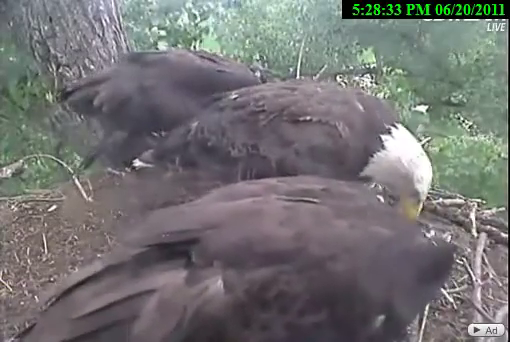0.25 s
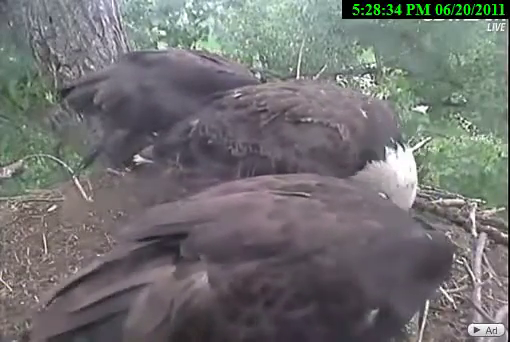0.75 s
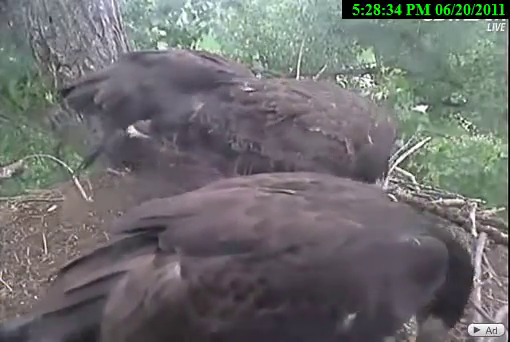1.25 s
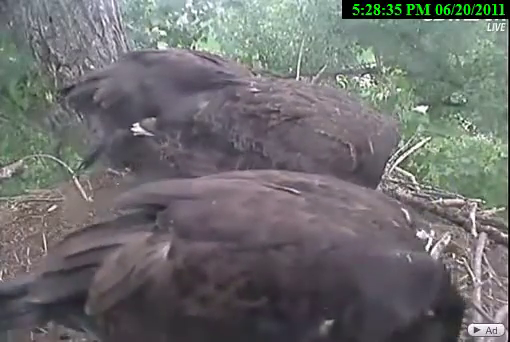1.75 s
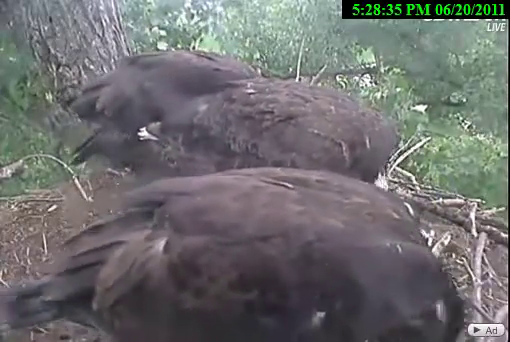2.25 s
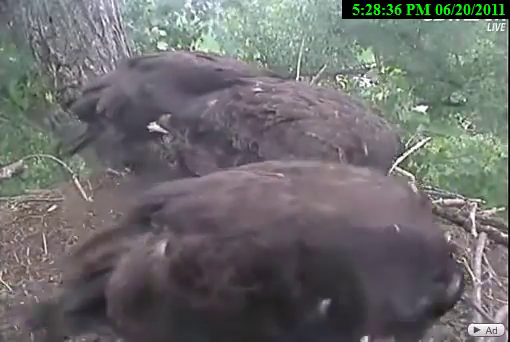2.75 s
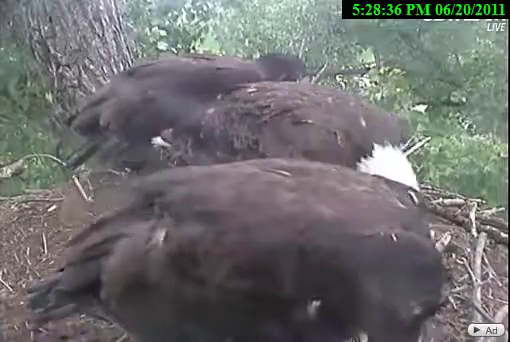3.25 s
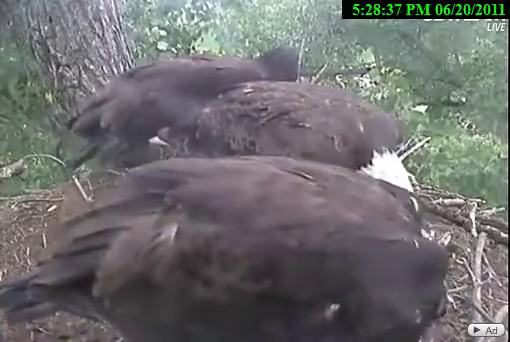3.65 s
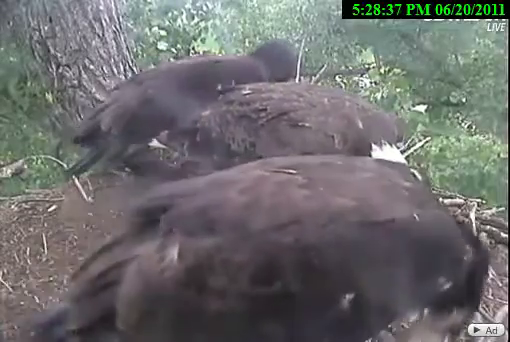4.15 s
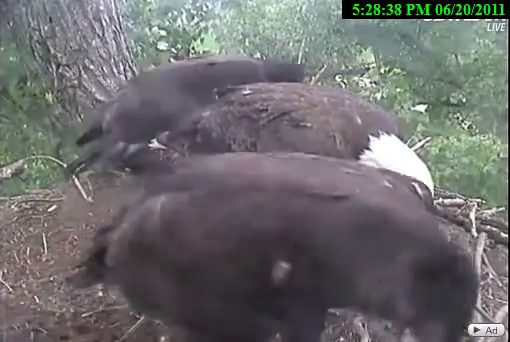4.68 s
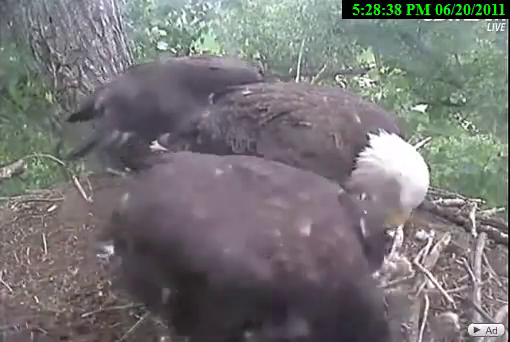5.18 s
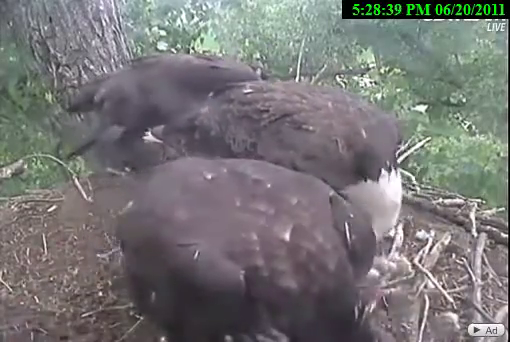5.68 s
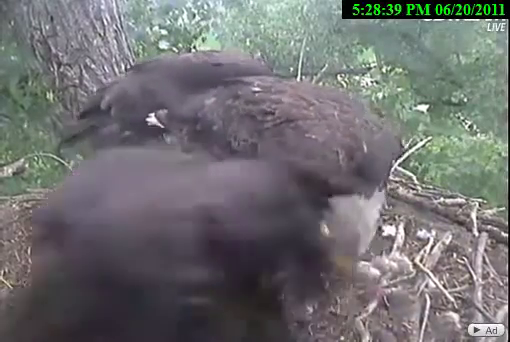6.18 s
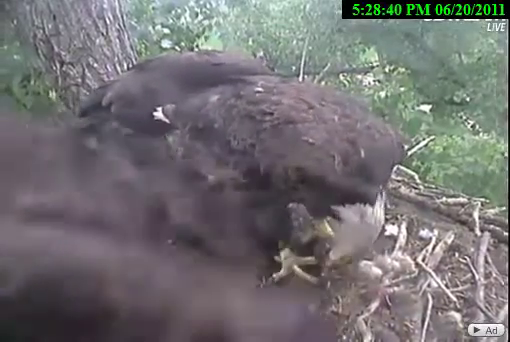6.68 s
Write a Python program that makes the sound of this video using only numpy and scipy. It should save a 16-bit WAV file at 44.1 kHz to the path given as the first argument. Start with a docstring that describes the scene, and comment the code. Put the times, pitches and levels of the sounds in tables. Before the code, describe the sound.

Over a steady, faraway hum in the woods, a soft rustle of feathers leads into a string of six shrill begging squeals from a young eagle. The whistles rise, waver and rasp, sometimes splitting into two tones, and the later ones start with a tiny peep. A few light knocks and a crunch come from the nest's sticks. The close outdoor microphone overloads a little on the peaks.

```python
"""A young eagle begs on a stick nest in woodland, close to a cheap outdoor microphone. First, over a distant
drone, feathers rustle and another bird's falling chirp rings out as the first of six squeals begins. In each,
the whistle climbs in steps, turns hoarse, at times splits in two, and finally drops. From the second squeal on,
a peep leads in, and now and then sticks knock or crunch. Throughout, the trees return the sound, and the
loudest whistles overload a slow converter."""
import sys
import numpy as np
from scipy import signal
from scipy.fft import rfft, irfft, next_fast_len
from scipy.io import wavfile
from scipy.ndimage import uniform_filter1d, minimum_filter1d

SR = 44100
rng = np.random.default_rng(int(sys.argv[2]) if len(sys.argv) > 2 else 0)


def master_out(mix):
    """Clip the mix to full scale and print it as 16-bit PCM to the path in sys.argv[1]."""
    frames = np.transpose(np.atleast_2d(mix))
    ceiling = np.clip(frames, -1, 1)
    pcm = np.round(ceiling * 32767).astype(np.int16)
    wavfile.write(sys.argv[1], SR, pcm)


N = 305172

# spectral density of the distant drone: frequency_hz, relative_db
DRONE_SPECTRUM = [(12, -57.5), (20, -25), (110, -16), (172, -13.5), (339, -12.5), (489, -10.5), (764, -4.5),
                  (1260, -20), (1630, -29.5), (3680, -34.5), (4540, -29), (4910, -43), (5750, -37),
                  (8080, -47), (10500, -54.5), (13600, -103), (22000, -120)]
# harmonics of the mains hum: frequency_hz, level_db
MAINS_HARMONICS = [(60, -63.5), (120, -63.5)]
# feathers brushing over dry sticks: start_s, end_s, level_db
FEATHER_STROKES = [(0., 0.084, -45.5), (0.085, 0.305, -42), (0.402, 0.68, -42.5)]
# normal modes of the sticks: frequency_hz, relative_db, t60_s
STICK_MODES = [(338, -16, 0.036), (577, -0.5, 0.014), (744, -9.5, 0.074), (1160, -12.5, 0.034),
               (1550, -6, 0.011), (2800, -39, .01)]
# blows on the sticks: start_s, relative_db, contact_ms
STICK_BLOWS = [(2.282, 5, 0.95), (2.29, -10, 0.49), (2.295, -21, 0.99), (2.3, 1.5, 0.82), (2.304, -4, 0.37),
               (2.599, -15, 0.74), (2.991, -12.5, 1), (5.163, -6, 1), (5.175, -4, 0.58), (5.191, -14, 0.98),
               (5.285, -22, 0.79), (6.732, -6.5, 0.92)]
# twigs crunching under a foot: start_s, length_s, relative_db
TWIG_CRUNCHES = [(2.28, 0.029, -23), (2.574, 0.033, -53)]
# the opening, falling chirp: time_s, pitch_hz, level_db, overtone_relative_db
CHIRP_CONTOUR = [(.117, 3710, -26, -20), (.124, 3390, -23.5, -19), (.134, 2960, -20, 5.5),
                 (.143, 2890, -18, -4), (.154, 2746, -28, -14), (.157, 2820, -14, -8)]
# short peeps: start_s, length_s, from_hz, to_hz, peak_db, overtone_relative_db
PEEP_GLIDES = [(0.153, 0.026, 2220, 1960, -30, -28), (1.825, 0.016, 1420, 1400, -34, -6),
               (2.986, 0.029, 1350, 1400, -31.5, -20), (4.222, .021, 1310, 1460, -24.5, -13.5),
               (5.494, .024, 1250, 1520, -24, -18), (6.73, 0.029, 1260, 1450, -24, -5.5)]
# the other half of the voice box, one list a split: time_s, pitch_hz, level_db
SPLIT_CONTOURS = [
    [(.30, 3560, -34), (.34, 3760, -41), (.40, 3850, -41)],
    [(.85, 4800, -36), (.89, 4820, -35), (.96, 4750, -32)],
    [(2.46, 5560, -38), (2.53, 6000, -32), (2.6, 5440, -48)],
    [(3.07, 3650, -42), (3.2, 3700, -44), (3.31, 3750, -42), (3.41, 3750, -47)],
    [(4.79, 4870, -36), (4.87, 4600, -37), (4.89, 5220, -26), (4.925, 5480, -34), (4.94, 5000, -41),
     (5.1, 5020, -30.5)],
    [(5.74, 4240, -36), (5.78, 4380, -32), (5.815, 4380, -38)],
    [(6.15, 5000, -37), (6.25, 4850, -37), (6.32, 5000, -35.5), (6.385, 5190, -20)],
    [(6.478, 5770, -28), (6.495, 6085, -19), (6.52, 6170, -22), (6.535, 5760, -39)],
]
# resonances of the throat: centre_hz, width_hz, relative_db
THROAT_FORMANTS = [(2643, 720, 5), (3870, 1900, 8.5), (4550, 2000, -15), (6460, 2500, 2)]
# one list a squeal, each note held until the next: start_s, from_hz, to_hz, from_db, to_db, rasp_relative_db
SQUEAL_NOTES = [
    [(.15, 3620, 3656, -24, -23, -24), (.285, 3670, 3750, -27, -41, -15),
     (.315, 4035, 4323, -30, -28, -20.5), (.5, 4340, 4440, -23.5, -25, -25),
     (.6, 4450, 4390, -27, -39.5, -16), (.666, 4490, 5060, -30, -32, -21),
     (.775, 5045, 5164, -24, -24, -17.5), (.833, 5170, 5040, -27, -27, -24),
     (.861, 5135, 5340, -25.5, -22, -33), (.908, 5356, 5165, -25.5, -23.5, -31),
     (.963, 4840, 4704, -21.5, -18, -31), (1.04, 4700, 4780, -18.5, -19, -37),
     (1.075, 4765, 4800, -7, -10.5, -32), (1.18, 4705, 4990, -20.5, -20, -13.5),
     (1.265, 4798, 4795, -7, -19.5, -37), (1.35, 4920, 4970, -26.5, -25.5, -2),
     (1.41, 4880, 4760, -24, -12.5, -14)],
    [(1.837, 2650, 3490, -40.5, -25.5, -4), (1.865, 3550, 3550, -18, -39, -21),
     (1.88, 3650, 3794, -12, -28, -27), (1.937, 4090, 4240, -16, -19, -30),
     (1.985, 4200, 4470, -27, -14.5, -28), (2.038, 4380, 4310, -20.5, -22, -16.5),
     (2.087, 4268, 4210, -11.5, -13, -25.5), (2.168, 4346, 4360, -16, -23, -14.5),
     (2.225, 4440, 4614, -24.5, -9, -23), (2.28, 4540, 4760, -20, -14.5, -13),
     (2.325, 4760, 4700, -21, -29, -15), (2.351, 4800, 4756, -17, -20, -36),
     (2.395, 4930, 4720, -20.5, -22, -28), (2.465, 4850, 5130, -25, -17.5, -20),
     (2.545, 5170, 5010, -22, -18.5, -24), (2.598, 4930, 4800, -16.5, -15.5, -16.5)],
    [(3.013, 3350, 3531, -26, -23, -10), (3.029, 3607, 3690, -12, -10, -18),
     (3.053, 4220, 4360, -17, -26, -11.5), (3.098, 4315, 4224, -22, -18.5, -14),
     (3.168, 4236, 4320, -21, -38, -17), (3.235, 4480, 4430, -30, -38, -12),
     (3.32, 4490, 4510, -31.5, -22.5, -21), (3.365, 4460, 4790, -22, -23, -20),
     (3.393, 4660, 4600, -20, -22.5, -18), (3.43, 4820, 4980, -26, -25, -7.5),
     (3.475, 4950, 5304, -19.5, -11.5, -34), (3.535, 5410, 5300, -4.5, -19, -19.5),
     (3.585, 5110, 5256, -28.5, -14.5, -19), (3.628, 5170, 5420, -16, -34.5, -11.5),
     (3.676, 5180, 5350, -22, -10.5, -19), (3.735, 5240, 5410, -14.5, -13.5, -16),
     (3.79, 5520, 5250, -14.5, -11, -24)],
    [(4.238, 3370, 3500, -36, -17.5, -8), (4.271, 4080, 4140, -16.5, -18.5, -24),
     (4.325, 3710, 3710, -22, -11, -11.5), (4.346, 4255, 4910, -18.5, -37.5, -10),
     (4.45, 4290, 4740, -27, -28.5, -13.5), (4.55, 4680, 4760, -26.5, -21.5, -16.5),
     (4.643, 5300, 5380, -26, -17, -17), (4.682, 5330, 4900, -23, -32, -15),
     (4.71, 5200, 4890, -22, -27, -13), (4.737, 4750, 4930, -15.5, -23.5, -21),
     (4.78, 5290, 5390, -22.5, -18.5, -32), (4.826, 5350, 5430, -16, -27, -28),
     (4.882, 4710, 5010, -28, -23, -9), (4.932, 5290, 5330, -21, -32.5, -19),
     (5.012, 5310, 5310, -20.5, -29.5, -23)],
    [(5.497, 2665, 3565, -41.5, -28, -2), (5.56, 4020, 4490, -24.5, -33, -18),
     (5.685, 4510, 4330, -23, -37, -16), (5.716, 4165, 4320, -17.5, -28.5, -17.5),
     (5.818, 4450, 4330, -29, -23, -22), (5.857, 4274, 4385, -26, -21, -16),
     (5.9, 4400, 4370, -32.5, -24, -13), (5.934, 4570, 5060, -38, -31.5, -4),
     (5.985, 4900, 4750, -37, -31.5, -1), (6.051, 5040, 5220, -39.5, -35, 6.5),
     (6.1, 5426, 5580, -32, -38.5, 4), (6.14, 5520, 5260, -33.5, -40.5, 1),
     (6.226, 5390, 5500, -26.5, -19.5, -15), (6.28, 5590, 5330, -24.5, -16, -15.5),
     (6.388, 5294, 5360, -19, -19.5, -29), (6.44, 5344, 5460, -17, -7.5, -19),
     (6.48, 5530, 5740, -17, -17, -4.5)],
    [(6.75, 3280, 3535, -33, -10, 3), (6.77, 4246, 4306, -13.5, -17, -10),
     (6.795, 5120, 5030, -11.5, -17, -14), (6.83, 4760, 4950, -24, -17, -16),
     (6.875, 4790, 4460, -18.5, -15, -16), (6.895, 4500, 4590, -11, -13, -16)],
]
# the end of each squeal: droop_s, snap_s, foot_of_fall_db
SQUEAL_ENDINGS = [(1.437, 1.451, -28), (2.654, 2.669, -24), (3.866, 3.885, -38), (5.108, 5.131, -33),
                  (6.522, 6.548, -36), (6.92, 6.95, -30)]
# unsteady stretches of the whistle: start_s, end_s, flutter_fraction
WHISTLE_FLUTTERS = [(.3, .49, .35), (.775, .96, .35), (1.18, 1.262, .8), (1.353, 1.42, .8),
                    (1.99, 2.085, .45), (2.17, 2.24, .5), (2.29, 2.66, .6), (3.055, 3.2, .3),
                    (3.2, 3.47, .5), (3.58, 3.67, .3), (3.67, 3.8, .55), (4.27, 4.33, .5),
                    (4.37, 5.11, .65), (5.52, 5.71, .6), (5.74, 5.82, .5), (5.9, 6.33, .7),
                    (6.33, 6.385, .4), (6.48, 6.54, .5), (6.83, 6.88, .5)]
# quick throbs of the whistle: start_s, end_s, rate_hz, depth_fraction
WHISTLE_PURRS = [(.775, .86, 215, .9), (.86, .96, 175, .7), (5.765, 5.82, 230, .6)]

DRONE_DB, RESONANCE_HZ, RESONANCE_WIDTH_HZ, RESONANCE_DB = -33.5, 767.4, 64, -40.5
WOOD_T60_S, WOOD_DB = 0.32, -12.5
PEEP_EDGE_DB = -11.5
BREATH_DB, BREATH_SLOPE = -27.5, 0.49
JUMP_S, EASE_S = .003, .009
SNAP_HZ, SNAP_DB, SNAP_RASP_DB = 3950, -15, -6
FALL_S, FALL_HZ, TAIL_S, TAIL_DB, TAIL_RASP_DB = .017, 2701, .012, -43.5, 0
CALM_FLUTTER, FLUTTER_HZ, JITTER_HZ, WOBBLE_HZ = .12, 110, 55, 18
OCTAVE_DB, OCTAVE_TOP_HZ, OCTAVE_PATCHY_DB = -30, 5050, 4
RASP_HZ, RASP_ABOVE_HZ = 600, 350
LIMIT_TOP, LIMIT_S, CLIP_TOP, CLIP_KNEE, CLIP_SKEW, TOP_HZ = .295, .001, .26, 16., .008, 10600


def undb(db):
    """Amplitude ratio of a level in decibels."""
    return 10 ** (np.asarray(db) / 20)


def unit(x):
    """Normalisation to rms 1."""
    return x / np.sqrt(np.mean(x ** 2))


def noise(shape):
    """Spectral shaping: white noise weighted by shape(hz), at rms 1."""
    hz = np.arange(N // 2 + 1) * SR / N + 1e-3
    return unit(irfft(rfft(rng.standard_normal(N)) * shape(hz), N))


def walk(rate_hz):
    """Random modulation: low-passed noise of rms 1."""
    return noise(lambda hz: 1 / (1 + (hz / rate_hz) ** 4))


def turn(hz):
    """Phase as the time integral of frequency."""
    return 2 * np.pi * np.cumsum(hz) / SR


def scattered(phase, width_hz):
    """Quadrature modulation spreads a tone into a noise band of the same power."""
    return (walk(width_hz) * np.sin(phase) + walk(width_hz) * np.cos(phase)) / np.sqrt(2)


def contours(tables, fade_s=0.0034):
    """A gate open while any table lasts, and the columns interpolated linearly in time."""
    t = np.arange(N) / SR
    times, *columns = np.vstack(tables).T
    gate = sum(np.clip(np.minimum(t - rows[0][0], rows[-1][0] - t) / fade_s + 1, 0, 1) for rows in tables)
    return gate, [np.interp(t, times, column) for column in columns]


def stretches(rows, base):
    """A step function of (start_s, end_s, value) rows, smoothed by a moving average."""
    out = np.full(N, float(base))
    for start, end, value in rows:
        out[int(start * SR):int(end * SR)] = value
    return uniform_filter1d(out, size=200)


def drone():
    """Broadband noise under slow amplitude modulation, with one narrow resonance and mains hum."""
    hz, db = np.transpose(DRONE_SPECTRUM)
    far = noise(lambda f: undb(np.interp(np.log(f), np.log(hz), db)))
    low = signal.sosfilt(signal.butter(2, 450, fs=SR, output="sos"), far)
    swell = walk(3.8)
    bass = low * undb(0.47 * swell + 0.49 * walk(2.2))
    treble = (far - low) * undb(0.61 * swell + 0.57 * walk(8.7))
    hum = sum(np.sqrt(2) * undb(level_db + 0.93 * walk(2.5)) * np.sin(turn(np.full(N, f)))
              for f, level_db in MAINS_HARMONICS)
    resonance = noise(lambda f: 1 / (1 + (2 * (f - RESONANCE_HZ) / RESONANCE_WIDTH_HZ) ** 2))
    return undb(DRONE_DB) * (bass + treble) + undb(RESONANCE_DB) * resonance + hum


def woodland(near):
    """Reverberation: scattering from trunks and leaves gives an exponentially decaying response."""
    t = np.arange(SR // 2) / SR
    envelope = np.exp(-np.log(1000) * t / WOOD_T60_S) * np.minimum(t / 0.0058, 1)
    response = rng.standard_normal(len(t)) * envelope
    return undb(WOOD_DB) * signal.fftconvolve(near, response / np.sqrt(np.sum(response ** 2)))[:N]


def feathers():
    """Friction of feathers on dry sticks gives a dense, patchy crackle in the treble."""
    grains = rng.standard_normal(N) * undb(2.7 * rng.exponential(size=N) + 2 * walk(25))
    hiss = unit(signal.sosfilt(signal.butter(6, [2300, 7500], "band", fs=SR, output="sos"), grains))
    return hiss * stretches([(start, end, undb(db)) for start, end, db in FEATHER_STROKES], 0)


def sticks():
    """Impact excitation of damped modes: one force pulse makes a knock, dense random clicks a crunch."""
    force, t = np.zeros(N), np.arange(N) / SR
    for start_s, db, contact_ms in STICK_BLOWS:
        pulse = np.hanning(max(int(contact_ms * SR / 1000), 3) + 2)
        start = int(start_s * SR)
        force[start:start + len(pulse)] += undb(db) * pulse / pulse.sum()
    ring = sum(undb(db) * np.exp(-np.log(1000) * t[:4000] / t60) * np.sin(2 * np.pi * hz * t[:4000])
               for hz, db, t60 in STICK_MODES)
    vibration = signal.fftconvolve(force, 0.44 * ring)[:N]
    # thin sticks radiate no deep bass
    knocks = signal.sosfilt(signal.butter(3, 340, "high", fs=SR, output="sos"), vibration)
    clicks = unit(rng.standard_normal(N) * undb(3.0 * rng.exponential(size=N)))
    airborne = unit(signal.sosfilt(signal.butter(2, [400, 4500], "band", fs=SR, output="sos"), clicks))
    through_wood = unit(signal.fftconvolve(clicks, ring)[:N])
    tread = sum(undb(db) * np.clip(np.minimum(t - start, start + length - t) / 0.0017, 0, 1)
                for start, length, db in TWIG_CRUNCHES)
    return knocks + tread * (airborne + 1.32 * through_wood)


def peeps():
    """Brief glides of a fundamental and its second harmonic: another bird's opening chirp, and peeps as the
    whistle catches."""
    # each peep glides evenly and is loudest in its middle
    arches = [[(start + k * length, hz + k * (to_hz - hz), db + PEEP_EDGE_DB * abs(2 * k - 1), over_db)
               for k in (0, .5, 1)]
              for start, length, hz, to_hz, db, over_db in PEEP_GLIDES]
    gate, (hz, db, overtone_db) = contours([CHIRP_CONTOUR] + arches)
    phase = turn(hz + 30 * walk(124))
    tone = np.sin(phase) + undb(overtone_db) * np.sin(2 * phase)
    return gate * np.sqrt(2) * undb(db + 3.4 * walk(200)) * tone


def second_whistle():
    """Biphonation: the other half of the voice box adds a less steady tone that beats with the first."""
    gate, (hz, db) = contours(SPLIT_CONTOURS)
    phase = turn(hz)
    return gate * np.sqrt(2) * undb(db) * (.55 * np.sin(phase) + .85 * scattered(phase, 170))


def breath(effort_db):
    """Source and filter: throat formants shape a hiss that grows with hoarse effort, less than the voice."""
    hiss = noise(lambda f: sum(undb(db) / (1 + (2 * (f - centre) / width) ** 2) ** 2
                               for centre, width, db in THROAT_FORMANTS))
    return hiss * undb(BREATH_DB + BREATH_SLOPE * effort_db + 5.4 * walk(13.5))


def purr():
    """Amplitude modulation at constant mean power makes the whistle throb."""
    rate_hz = stretches([(start, end, hz) for start, end, hz, _ in WHISTLE_PURRS], 0)
    depth = stretches([(start, end, fraction) for start, end, _, fraction in WHISTLE_PURRS], 0)
    throb = np.sin(turn(rate_hz * (1 + .12 * walk(40))))
    return (1 + depth * throb) / np.sqrt(1 + depth ** 2 / 2)


def octave(phase, hz, db):
    """The second harmonic follows the whistle's level, sputters, and dies out on the highest notes."""
    harmonic = undb(OCTAVE_DB + db) * (.4 * np.sin(2 * phase) + scattered(2 * phase, 350))
    return harmonic * undb(OCTAVE_PATCHY_DB * walk(14)) / (1 + (hz / OCTAVE_TOP_HZ) ** 40)


def phrase(notes, droop_s, snap_s, fall_db):
    """Contour of one squeal: the pitch jumps from note to note, droops, snaps and falls away hoarsely."""
    ends = [note[0] - JUMP_S for note in notes[1:]] + [droop_s]
    points = []
    for (start, hz, to_hz, db, to_db, rasp_db), end in zip(notes, ends):
        points += [(start, hz, db, rasp_db), (end, to_hz, to_db, rasp_db)]
    return points + [(snap_s, SNAP_HZ, SNAP_DB, SNAP_RASP_DB),
                     (snap_s + FALL_S, FALL_HZ, fall_db, TAIL_RASP_DB),
                     (snap_s + FALL_S + TAIL_S, FALL_HZ, TAIL_DB, TAIL_RASP_DB)]


def squeals():
    """A nearly pure tone; random modulation adds sidebands, narrow for flutter and wide for hoarseness."""
    phrases = [phrase(notes, *ending) for notes, ending in zip(SQUEAL_NOTES, SQUEAL_ENDINGS)]
    gate, (hz, db, rasp_db) = contours(phrases)
    db = uniform_filter1d(db, size=int(EASE_S * SR))  # loudness follows a jump more gently than pitch
    flutter = stretches(WHISTLE_FLUTTERS, CALM_FLUTTER)
    throbbing = purr()
    phase = turn(hz + WOBBLE_HZ * walk(18) + JITTER_HZ * flutter * walk(51.2))
    whistle = np.sqrt(1 - flutter ** 2) * np.sin(phase) + flutter * scattered(phase, FLUTTER_HZ)
    overtone = octave(phase, hz, db)
    # hoarseness comes in ragged bursts, mostly above the pitch
    rasp = undb(rasp_db + 0.92 * walk(60)) * scattered(turn(hz + RASP_ABOVE_HZ), RASP_HZ)
    voice = np.sqrt(2) * undb(db) * (throbbing * whistle + rasp)
    return gate * (voice + overtone + breath(db + rasp_db))


def scene():
    """Superposition of the direct sound from the nest, its reverberation and the drone."""
    near = squeals() + second_whistle() + peeps() + sticks() + feathers()
    return (near + woodland(near) + drone())[None]


def record(dry):
    """Aliasing: after a quick limiter, a half-rate converter clips, so overtones fold back as thin tones."""
    envelope = np.abs(signal.hilbert(dry, next_fast_len(N), axis=1)[:, :N])
    span = int(LIMIT_S * SR)
    gain = np.minimum(1, LIMIT_TOP / (envelope + 1e-9))
    gain = uniform_filter1d(minimum_filter1d(gain, size=span), size=span)
    biased = signal.resample_poly(dry * gain, 1, 2, axis=1) + CLIP_SKEW
    clipped = biased / (1 + np.abs(biased / CLIP_TOP) ** CLIP_KNEE) ** (1 / CLIP_KNEE) - CLIP_SKEW
    full_rate = signal.resample_poly(clipped, 2, 1, axis=1)[:, :N]
    return signal.sosfilt(signal.ellip(10, .2, 80, TOP_HZ, fs=SR, output="sos"), full_rate)


dry = scene()
out = record(dry)
master_out(out)
```